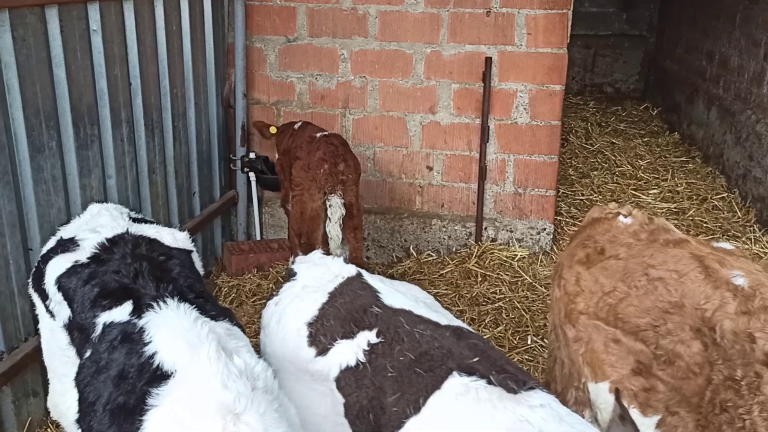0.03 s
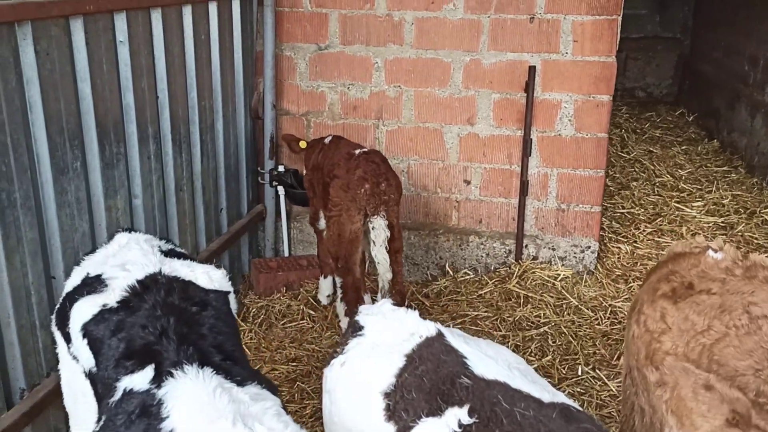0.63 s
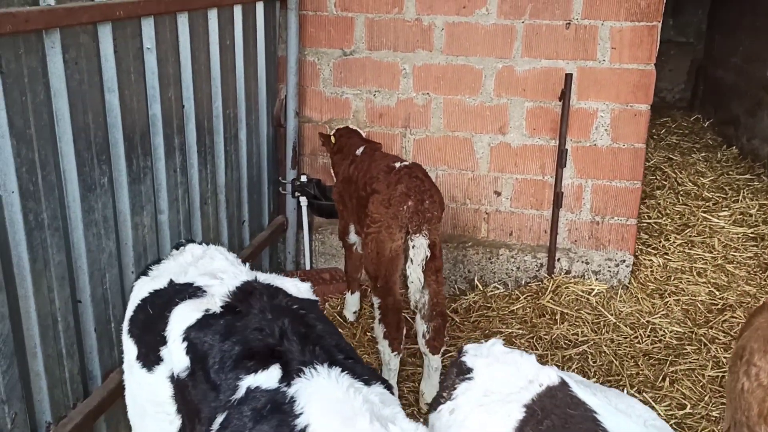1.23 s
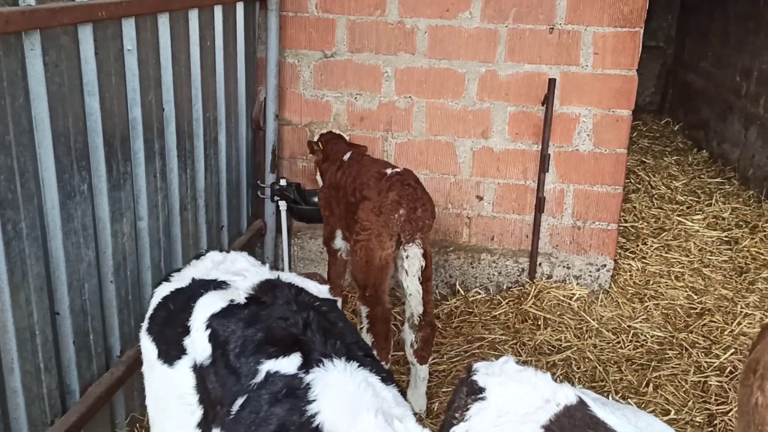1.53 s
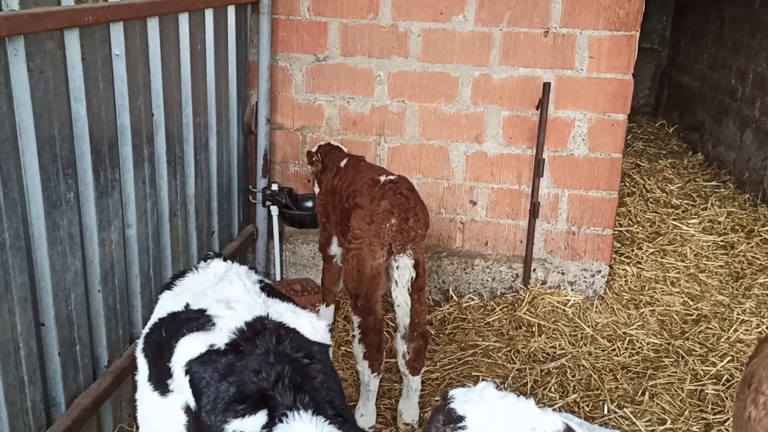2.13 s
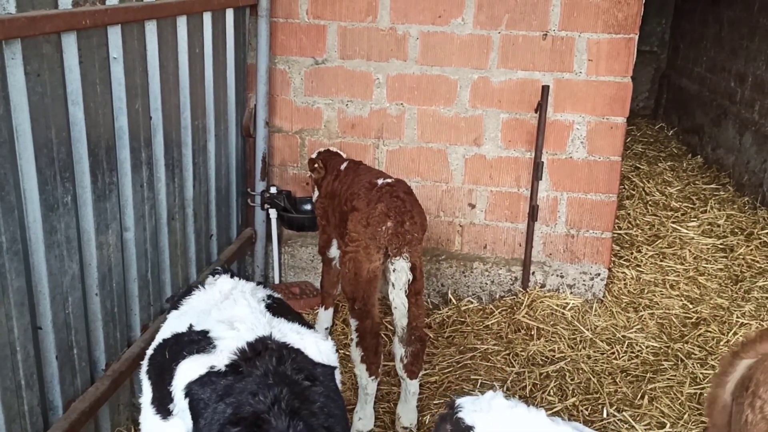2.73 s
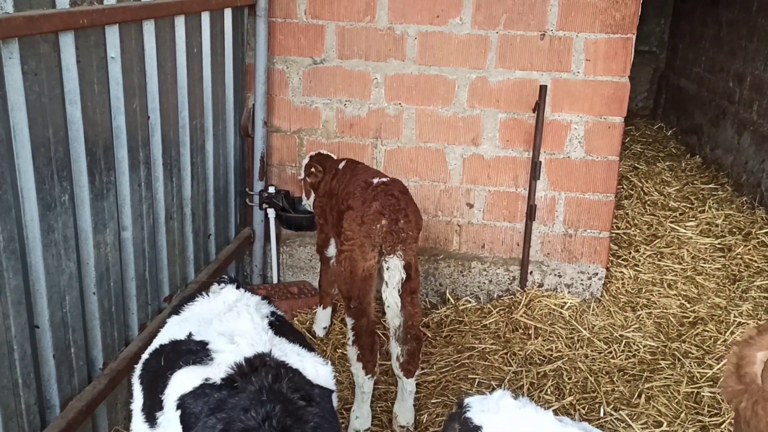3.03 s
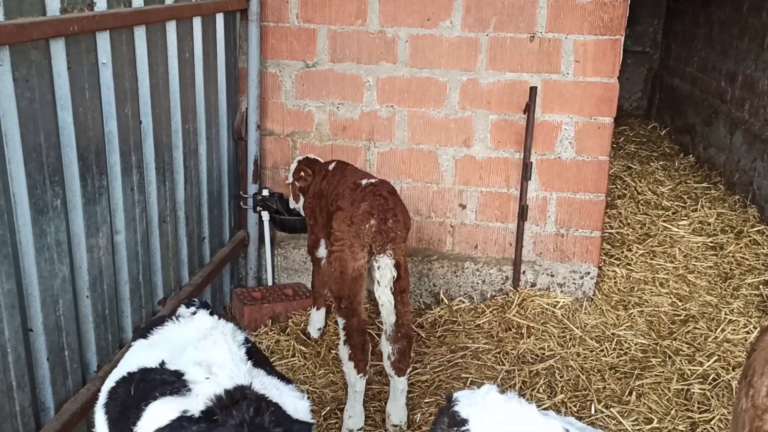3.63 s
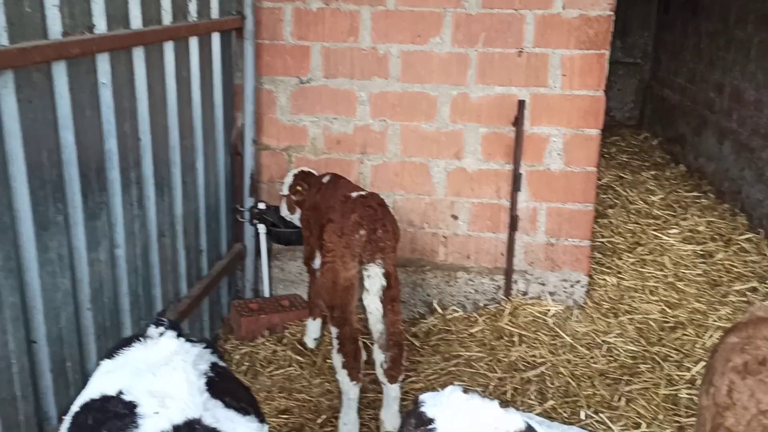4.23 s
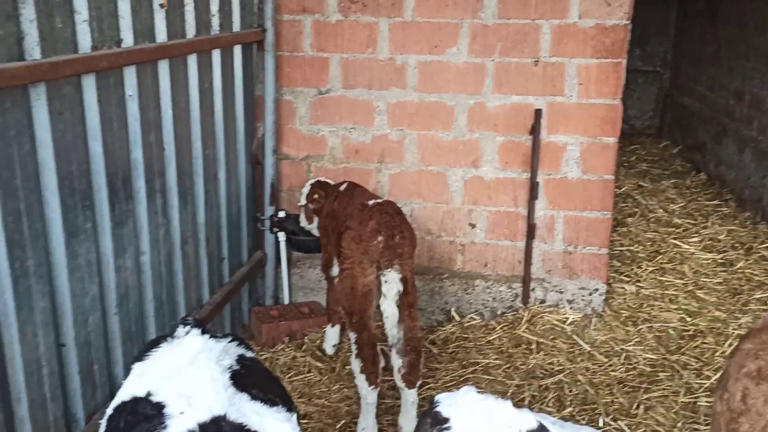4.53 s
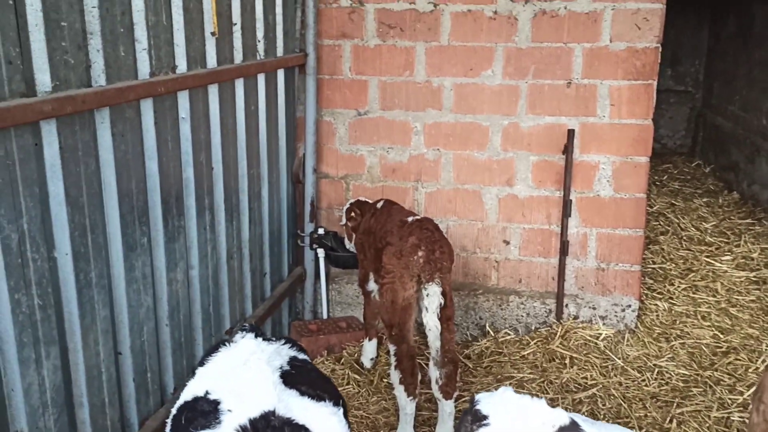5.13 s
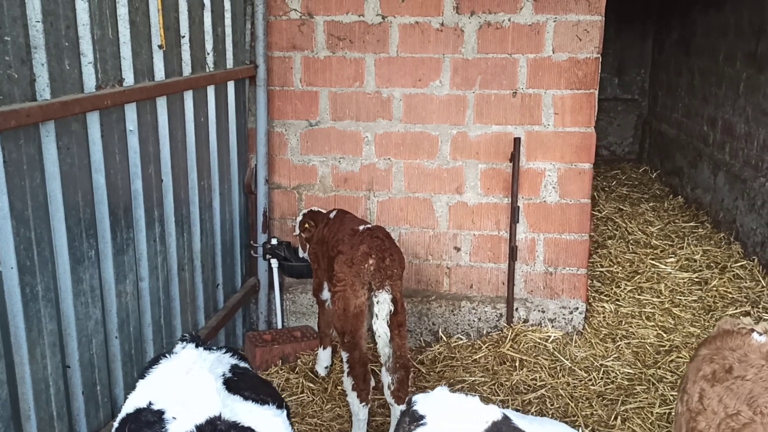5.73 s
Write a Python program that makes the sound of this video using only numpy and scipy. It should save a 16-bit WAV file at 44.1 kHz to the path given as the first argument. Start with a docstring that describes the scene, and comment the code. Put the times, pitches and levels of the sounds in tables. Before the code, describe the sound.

Water hisses and sprays in two long draughts as a calf drinks, over low rumbling, soft hoof thuds and straw rustles.

```python
"""A straw-bedded barn of brick and sheet steel, heard on a spaced stereo pair at the edge of the pen.
A calf drinks from a self-filling water bowl: the valve hisses and sprays while its muzzle presses
the ticking, rasping paddle. Hooves rustle the straw; dull thuds are probably hooves on the floor.
Behind it a low rumble, probably wind on the sheeting, swells in the barn's resonances, loose sheets
knock, and a faint motor hums in the steady air of the yard."""
import sys
import numpy as np
from scipy import signal
from scipy.fft import rfft, irfft
from scipy.io import wavfile
from scipy.ndimage import uniform_filter1d

SR = 44100
rng = np.random.default_rng(int(sys.argv[2]) if len(sys.argv) > 2 else 0)


def output_pcm(signal):
    """Save a mono or channel-first signal as 16-bit PCM at the path in sys.argv[1].

    Samples are clipped to [-1, 1] before scaling.
    """
    pcm = np.clip(np.atleast_2d(signal).T, -1, 1) * 32767
    wavfile.write(sys.argv[1], SR, np.round(pcm).astype(np.int16))


N = 259308
TIME = np.arange(N) / SR
HZ = np.maximum(np.arange(N // 2 + 1) * SR / N, 1)
MIC_LAG_S = .0005   # travel time from one microphone to the other

# resonances of the valve body: (centre [Hz], width [Hz], lift [dB])
VALVE_MODES = [(1960, 160, 3.5), (2950, 450, -2), (3800, 300, 4.5), (4190, 70, 2), (6800, 110, 3),
               (7020, 200, -2), (7440, 150, 3.5), (7640, 70, 9), (7760, 120, -3), (8130, 90, 2),
               (12980, 100, 4), (13610, 90, 4), (14210, 80, 3), (14400, 100, 4), (14940, 100, 3)]
# resonances of the barn: (centre [Hz], width [Hz], lift [dB])
BARN_MODES = [(57, 10, -5.5), (89.7, 6.1, 4.5), (112, 14, -2.5), (123.4, 15, 8), (157, 9.3, 8.5),
              (205.2, 25, 5), (240, 8, -3), (322.7, 9.8, 6.5), (375, 7.9, -2), (670, 14, 3)]


def drinker():
    """The jet hisses in the valve body, spatters on the bowl and breaks into fine, spluttering spray."""
    # the muzzle holds the paddle down: (time [s], length [s], jet [dB], spray [dB], closing time [s])
    presses = [(0.178, .05, -48.5, -57, 0.18), (0.735, 0.079, -47.5, -49.5, 0.019),
               (0.872, 1.776, -49.5, -55.5, 0.07), (3.12, .1, -55.5, -68, 0.017),
               (3.716, 1.843, -49.5, -57.5, 0.036), (5.76, 0.033, -55, -60, 0.022)]
    # how fully the water runs in the long draughts: (time [s], jet gain [dB], spray gain [dB])
    flow = [(1.08, -6, -6), (1.24, -0.5, 0), (1.33, -1, -1), (1.44, 2, 0), (1.55, -1.5, -5),
            (1.66, 2.5, 0.5), (1.76, 0, 4.5), (1.87, 1.5, 2.5), (2.0, 0.5, -0.5), (2.2, 0.5, -2.5),
            (2.37, -3.5, -6), (2.5, -0.5, 0), (2.65, -0.5, -4), (3.77, 5.5, 5), (3.87, 0, 0),
            (3.98, 1.5, -2.5), (4.17, 0, -1.5), (4.31, 0, 3), (4.55, -1, -5), (4.75, -1.5, -6),
            (4.95, 0, -4.5), (5.08, 0, 0.5), (5.3, -.5, -1.5), (5.53, -4, -4.5)]
    # spectra of the jet, the spray and the spatter on the bowl: (frequency [Hz], level [dB])
    jet_spectrum = [(900, -6.5), (1900, -9), (2500, -6.5), (3700, -5.5), (4650, -5), (4900, -11.5),
                    (5950, -9), (6200, 1), (8450, -3), (8700, -22.5), (9300, -63.5)]
    spray_spectrum = [(10500, -50.5), (11300, -45), (11650, 9), (12700, 9), (13100, 8), (15450, 10),
                      (16000, -29)]
    spatter_spectrum = [(1500, -25.5), (3000, -3), (4300, -10), (5100, -9), (6300, -7), (7700, 0.5),
                        (8450, -3), (8900, -57)]
    # the jet surges as it catches air: (time [s], level [dB], rise [s], decay [s])
    surges = [(1.36, -62, .012, 0.022), (1.722, -51, .006, 0.028), (1.79, -67, .01, .02),
              (1.977, -53, .004, 0.011), (3.729, -52, 0.0088, .035)]
    # sharp spits at the nozzle: (time [s], level [dB], rise [s], decay [s])
    spits = [(.169, -49, 0.0009, 0.006), (.518, -53.5, .0015, 0.0039), (1.7225, -42, .001, 0.018),
             (1.892, -50, 0.00088, 0.0066), (2.258, -58, .012, .015), (3.729, -59, 0.0032, 0.038),
             (5.641, -60, .001, 0.0039)]
    dribble_jet_db, dribble_spray_db = -64.5, -70.5   # the released valve keeps dribbling

    drops = .22 * from_side(grains(per_s=63, spread_db=1))
    jet = diffuse() + .5 * from_side(grains(per_s=2000, spread_db=2)) + drops / 2
    spray = diffuse() + .35 * from_side(grains(per_s=290, spread_db=-4)) + drops
    jet = walled(colour(jet, jet_spectrum, VALVE_MODES), spread_db=1.7, width_hz=32)
    spray = walled(colour(spray, spray_spectrum, VALVE_MODES), spread_db=1.7, width_hz=32)
    impacts = barn_echo(from_side(grains(per_s=130, spread_db=3)))
    spatter = from_db(-15) * colour(impacts, spatter_spectrum)

    splutter = from_db(.6 * drift(rate_hz=14))   # uneven flow moves jet and spray together
    flicker = from_db(1.5 * drift(rate_hz=25))
    start, length, jet_db, spray_db, closing = np.transpose(presses)
    jet_flow_db, spray_flow_db = in_time(flow)
    jet_flow = valve(zip(start, length, jet_db, closing)) * from_db(jet_flow_db)
    spray_flow = valve(zip(start, length, spray_db, closing)) * from_db(spray_flow_db)
    jet_level = np.hypot(from_db(dribble_jet_db), jet_flow) * splutter + bursts(surges)
    spray_level = np.hypot(from_db(dribble_spray_db), spray_flow) * splutter * flicker + bursts(spits)
    return (swelling(jet) + spatter) * jet_level * pan(.3) + spray * spray_level * pan(-2.5)


def valve(presses, open_s=.031):
    """Envelope of the flow: each press opens the valve quickly, holds it and lets it close."""
    flow = np.zeros(N)
    for start, length, db, closing in presses:
        opening = np.clip((TIME - start) / open_s, 0, 1)
        flow += from_db(db) * opening * np.exp(-np.maximum(TIME - start - length, 0) / closing)
    return flow


def swelling(jet):
    """Each band of the jet's hiss swells and sinks by itself."""
    # bands of the jet's resonances: (centre [Hz])
    centres = [2000, 3500, 4400, 6500, 7700]
    spectrum = rfft(jet)
    bands = (irfft(spectrum * np.interp(HZ, centres, weights), N) for weights in np.eye(len(centres)))
    return sum(band * from_db(1.4 * drift(rate_hz=9)) for band in bands)


def paddle_rasps_and_hiss_swell():
    """Grainy noise rings one resonance at a time, some sliding, over a bright, dry hiss."""
    # at 1.33 s the valve's hiss swells and brightens briefly; the other rows are slips of the paddle:
    # (time [s], level [dB], rise [s], decay [s], centre [Hz], width [Hz], slide [Hz/s])
    events = [(.171, -49, 0.017, .035, 2320, 900, 0), (.762, -53, 0.035, 0.03, 4570, 380, 0),
              (.76, -55.5, 0.042, 0.058, 3600, 1200, 0), (1.33, -52, .14, 0.027, 6900, 1100, 0),
              (2.254, -50, 0.011, 0.028, 3800, 700, 0), (2.262, -52, .02, .01, 7160, 1200, 0),
              (3.183, -49.5, 0.025, 0.032, 3870, 1000, -9000), (3.735, -48.5, 0.015, 0.035, 1850, 450, 1),
              (3.733, -60, 0.02, 0.026, 4040, 800, 2), (4.935, -51.5, 0.0093, 0.037, 3700, 1190, 0),
              (5.758, -57.5, 0.0083, 0.04, 4050, 450, -7000)]
    # spectrum of the dry hiss: (frequency [Hz], level [dB])
    hiss_spectrum = [(1200, -23), (3000, -17), (4400, -17), (5100, -27), (6500, 6), (7700, 7), (8450, 10),
                     (9000, -65)]
    noise = diffuse() + .31 * from_side(grains(per_s=800, spread_db=4))
    spectrum = rfft(noise)
    hiss = from_db(-3) * colour(noise, hiss_spectrum, VALVE_MODES)
    out = np.zeros((2, N))
    for start, db, rise, decay, hz, width, slide in events:
        band = np.exp(-np.log(2) * (2 * (HZ - hz) / width) ** 2 / 2)
        resonance = np.fft.ifft(spectrum * band, N)   # complex, so the glide can shift its pitch
        glide = np.exp(1j * np.pi * slide * (TIME - start - rise) ** 2)
        ringing = rms_one(np.real(resonance * glide))
        out += (ringing + hiss) * bursts([(start, db, rise, decay)])
    return out


def bowl_ticks():
    """Hard, well-damped contacts, probably the paddle, each with early echoes and a short tail."""
    # ticks at the bowl: (time [s], level [dB], left minus right [dB])
    ticks = [(0.088, -36, 12), (0.097, -35, 4), (0.1706, -31, 2), (.2415, -35.5, 1), (0.297, -34.5, -1),
             (0.519, -37, 5), (0.6805, -27, 7), (.9307, -28.5, 9), (1.6518, -27, 10), (1.8926, -20, 5),
             (3.08, -45, 3), (4.053, -31, 9)]
    # what the paddle rings with: (frequency [Hz], gain [dB], time to fall 60 dB [s])
    modes = [(4200, -20, .005), (5500, -14, .002), (6800, -4, .0032), (7600, -2, .0045)]
    # echoes off bowl, sheeting and far wall: (delay [s], gain [dB], left minus right [dB])
    echoes = [(.0042, -10, 3), (.0062, -14, -3), (.0083, -13, 2), (.0158, -9, -7), (.0185, -16, 3),
              (.0208, -14, -2)]
    start, db, side_db = np.transpose(ticks)
    out = np.zeros((2, N))
    for hz, mode_db, t60 in modes:
        size = from_db(db + mode_db + rng.normal(0, 1, len(start)))
        clicks = np.zeros((2, N))
        clicks[:, (start * SR).astype(int)] = size * pan(side_db)
        for delay, echo_db, echo_side_db in echoes:
            clicks[:, ((start + delay) * SR).astype(int)] += size * from_db(echo_db) * pan(echo_side_db)
        out += ring(clicks, hz, t60)
    out = signal.sosfilt(signal.cheby2(10, 60, 9400, "low", fs=SR, output="sos"), out)
    out = signal.sosfilt(signal.butter(4, 4000, "high", fs=SR, output="sos"), out)
    return barn_echo(out)


def straw():
    """A hoof crushes many stalks, then sinks in with a dull crunch; single stalks crackle in clumps."""
    # hooves shuffling, and weight coming down: (time [s], level [dB], rise [s], decay [s])
    steps = [(.1695, -42.5, 0.00087, 0.0061), (.172, -46.5, 0.003, 0.028), (.185, -46, .026, .018),
             (.296, -44.5, .001, 0.0048), (.888, -45, 0.026, 0.036), (1.34, -46, 0.0089, 0.019),
             (1.635, -48, 0.027, 0.036), (2.255, -51.5, 0.014, 0.038), (2.81, -53, .012, 0.048),
             (3.18, -51, 0.082, 0.084), (3.48, -56, 0.017, 0.1), (3.727, -49, 0.004, 0.063),
             (4.051, -50, .001, 0.0071), (4.66, -49.5, 0.0058, 0.13), (4.85, -51.5, 0.0059, 0.093),
             (4.94, -47.5, 0.015, 0.027)]
    treads = [(.277, -40.5, 0.0054, 0.083), (.56, -42, .002, 0.029), (.68, -45, 0.005, 0.042),
              (.92, -47.5, 0.011, 0.19), (1.65, -49, 0.011, 0.21)]
    # spectra of rustling straw and crunching bedding: (frequency [Hz], level [dB])
    straw_spectrum = [(500, -3.5), (1100, 3), (1600, 3.5), (2100, 4), (2350, -1.5), (3000, 0.5),
                      (4100, -2.5), (5100, -12), (6300, -7.5), (7600, 0), (8450, -11.5), (9000, -70)]
    bedding_spectrum = [(150, -28), (300, 5), (600, 8), (900, 1.5), (1300, -14), (3000, -41), (8000, -61)]
    crackle = from_side(grains(per_s=1100, spread_db=3.5)) + 1.2 * diffuse()
    rustle = walled(colour(crackle, straw_spectrum), spread_db=1.4, width_hz=70)
    crunch = colour(crackle, bedding_spectrum)
    snaps = barn_echo(from_side(grains(per_s=220, spread_db=2.5)))
    stalks = colour(snaps, straw_spectrum)
    clumps = from_db(-64 + 4 * np.minimum(drift(rate_hz=10), 2))
    return rustle * bursts(steps) + crunch * bursts(treads) + stalks * clumps


def hoof_thuds():
    """The packed floor and the pen boom briefly, probably under hooves."""
    # dull thuds: (time [s], level [dB], rise [s], decay [s])
    thuds = [(.27, -31.5, 0.01, 0.04), (.348, -33.5, 0.0036, 0.017), (.452, -36, 0.0075, 0.012),
             (.526, -30.5, .003, .012), (.558, -30, 0.0037, 0.013), (.695, -31.5, 0.0044, 0.024),
             (.945, -37.5, 0.0066, 0.027), (1.034, -35, .003, 0.016), (2.376, -29, 0.01, .022),
             (3.83, -30, .012, .016)]
    # spectrum of a thud: (frequency [Hz], level [dB])
    thud_spectrum = [(50, -33), (110, -7), (190, 2.5), (280, 4), (400, -15.5), (700, -30), (3000, -90)]
    boom = colour(diffuse(likeness=1), thud_spectrum)
    return levelled(boom, samples=900) * bursts(thuds)


def rumble():
    """Gusts, probably wind on the sheeting, drive the barn's low resonances."""
    # spectrum of the rumble: (frequency [Hz], level [dB])
    rumble_spectrum = [(20, -46.5), (40, -33), (56, -16.5), (70, -14), (88, -6), (140, -5), (220, -0.5),
                       (370, -7), (450, -13.5), (650, -21), (900, -26), (1400, -49), (4000, -95.5)]
    # gusts on the building: (peak time [s], upper part [dB], deepest part [dB], half-length [s])
    gusts = [(0.472, -37.5, -62, 0.17), (1.68, -53, -49, 0.044), (1.97, -39.5, -57, 0.052),
             (2.42, -39, -43, 0.042), (2.61, -36.5, -41.5, 0.064), (3.184, -41.5, -54, 0.13),
             (3.6, -34.5, -47.5, 0.16), (4.117, -39, -53, 0.21), (4.432, -36.5, -40, 0.057),
             (4.81, -36.5, -65, 0.044), (5.03, -35, -45, 0.026), (5.214, -28, -46, 0.07),
             (5.355, -33.5, -42, 0.091), (5.539, -28, -36, 0.07), (5.712, -26, -38.5, 0.05),
             (5.818, -32, -48, 0.052)]
    # rumble between gusts: (time [s], upper part [dB], deepest part [dB])
    breeze = [(0, -41, -50.5), (.6, -45.5, -52), (.85, -42, -55.5), (1.05, -40.5, -53), (1.3, -42.5, -52.5),
              (1.9, -39.5, -51), (2.75, -40.5, -47), (2.92, -42.5, -56), (3.3, -40.5, -51.5),
              (5.88, -41.5, -51.5)]
    peak, upper_db, deep_db, half = np.transpose(gusts)
    upper_breeze_db, deep_breeze_db = in_time(breeze)
    boom = colour(diffuse(likeness=.97), rumble_spectrum, BARN_MODES)
    deep = irfft(rfft(boom) / (1 + (HZ / 105) ** 16), N)
    upper_level = gusting(upper_breeze_db, zip(peak, upper_db, half))
    # the deepest air swells a little later and more briefly
    deep_level = gusting(deep_breeze_db, zip(peak + .02, deep_db, half * .88))
    upper = upper_level * levelled(boom - deep, samples=3600)
    return upper + deep_level * levelled(deep, samples=6000) * pan(-.91)


def gusting(breeze_db, gusts):
    """Level of the wind: each gust adds a bell of power to the breeze."""
    power = sum(from_db(db) ** 2 * np.exp(-((TIME - peak) / half) ** 2) for peak, db, half in gusts)
    return np.sqrt(from_db(breeze_db) ** 2 + power)


def sheeting(drone_hz=355.4, drone_width_hz=17):
    """Dull knocks ring around 320 Hz. The early ones fall together with the hoof thuds, and the later ones come
    as loose steel sheets are buffeted. One panel drones on a single resonance."""
    # the knocks, and the panel's dying drone: (time [s], level [dB], rise [s], decay [s])
    knocks = [(.279, -41, 0.003, 0.031), (.345, -38.5, 0.0034, .025), (.526, -38, .003, 0.021),
              (.695, -37.5, 0.0045, 0.043), (5.15, -31, 0.018, 0.032), (5.228, -25, 0.0059, 0.025),
              (5.302, -32, 0.0023, 0.027), (5.36, -29, 0.0047, 0.054), (5.474, -26, 0.019, 0.027)]
    drone = [(0, -42.5, 0.018, 0.24)]
    # spectrum of a knock: (frequency [Hz], level [dB])
    knock_spectrum = [(100, -34), (240, -25), (320, 6), (390, -4), (460, -14), (800, -19), (2000, -92)]
    sheets = colour(diffuse(likeness=.99), knock_spectrum, BARN_MODES)
    panel = irfft(rfft(diffuse(likeness=1)) / (1 + (2 * (HZ - drone_hz) / drone_width_hz) ** 2), N)
    return levelled(sheets, samples=2000) * bursts(knocks) + levelled(panel, samples=4000) * bursts(drone)


def yard_air():
    """Steady air from the yard, partly all around and partly from the barn's open side."""
    # spectrum of the air: (frequency [Hz], level [dB])
    air_spectrum = [(25, -37.5), (60, -24.5), (120, -5.5), (350, 0), (650, -4), (1100, -16.5),
                    (1500, -13.5), (2000, -20), (2400, -25), (4000, -23.5), (5200, -33.5), (7500, -23),
                    (8500, -54), (9000, -67)]
    air = diffuse(likeness=.74) + .43 * from_side(rng.standard_normal(N))
    return from_db(-45.5) * walled(colour(air, air_spectrum), spread_db=3, width_hz=18)


def motor_hum(speed_waver=.0012, waver_db=1.8):
    """A faint motor hums in three tones, each wavering a little in pitch and level."""
    # motor tones: (frequency [Hz], gain [dB], phase lead at the right microphone [rad])
    tones = [(366, -1, 0.7), (480.3, -1, 1.33), (970, -11, 3.25)]
    # loudness of the motor: (time [s], level [dB])
    loudness = [(0, -58.5), (.9, -49), (1.5, -56), (3.6, -51.5), (4.4, -50.5), (5.5, -51), (5.88, -49.5)]
    motor_db, = in_time(loudness)
    hum = np.zeros((2, N))
    for hz, db, lead in tones:
        phase = 2 * np.pi * np.cumsum(hz * (1 + speed_waver * drift(rate_hz=2.83))) / SR
        level = from_db(motor_db + db + waver_db * drift(rate_hz=2.3))
        hum += np.sqrt(2) * level * np.sin(phase + np.array([[0], [lead]]))
    return hum


def motor_whine(roughness=.8, width_hz=24):
    """A thin whine rises out of the hum and sinks, blurred differently at each microphone by walls."""
    # course of the whine: (time [s], pitch [Hz], level [dB])
    course = [(4.0, 975, -72), (4.4, 978, -65), (4.84, 965, -66), (4.92, 978, -61.5), (5.05, 990, -61.5),
              (5.3, 985, -61), (5.52, 975, -63), (5.7, 970, -76)]
    hz, level_db = in_time(course)
    blur = np.array([drift(width_hz) + 1j * drift(width_hz) for mic in range(2)])
    tone = np.exp(2j * np.pi * np.cumsum(hz) / SR)
    return from_db(level_db) * rms_one(np.real((1 + roughness * blur) * tone))


def barn_echo(x, t60=.1, wet_db=-2):
    """Add a scattered tail from the walls, kept short by the bedding, different at each microphone."""
    t = TIME[:SR // 2]
    tail = rng.standard_normal((2, len(t))) * from_db(-60 * t / t60)
    tail /= np.sqrt(np.sum(tail ** 2, axis=1, keepdims=True))
    return x + from_db(wet_db) * signal.fftconvolve(x, tail, axes=1)[:, :N]


def walled(x, spread_db, width_hz):
    """Echoes off nearby hard walls leave narrow peaks and dips in the spectrum; rms 1."""
    bumps = rng.standard_normal(int(SR / width_hz))
    ripple_db = spread_db * np.interp(HZ / width_hz, np.arange(len(bumps)), bumps)
    return rms_one(irfft(rfft(x) * from_db(ripple_db), N))


def diffuse(likeness=.36):
    """Noise from all around: the spaced microphones hear it alike only at long wavelengths."""
    alike = likeness * np.sinc(2 * HZ * MIC_LAG_S)
    mid, side = rfft(rng.standard_normal((2, N)))
    return irfft(np.sqrt((1 + alike) / 2) * mid + np.sqrt((1 - alike) / 2) * side * [[1], [-1]], N)


def from_side(x):
    """Direct sound reaches the right microphone first."""
    return np.array([np.interp(TIME - MIC_LAG_S, TIME, x), x])


def pan(db):
    """Left and right gains for a level difference, positive to the left."""
    return from_db(np.array([[.5], [-.5]]) * db)


def colour(x, spectrum, modes=()):
    """Give a sound a broad spectrum with resonances on it; rms 1."""
    hz, level_db = np.transpose(spectrum)
    shape_db = np.interp(np.log(HZ), np.log(hz), level_db)
    for centre, width, lift_db in modes:
        shape_db += lift_db / (1 + (2 * (HZ - centre) / width) ** 2)
    return rms_one(irfft(rfft(x) * from_db(shape_db), N))


def grains(per_s, spread_db):
    """Random tiny clicks of uneven size; rms 1."""
    sizes = from_db(spread_db * np.minimum(rng.exponential(1, N), 4)) * rng.choice([-1, 1], N)
    return rms_one(sizes * (rng.random(N) < per_s / SR))


def bursts(rows):
    """Envelope of bursts that rise in a straight line and die away."""
    out = np.zeros(N)
    for start, db, rise, decay in rows:
        first = int(start * SR)
        t = TIME[:min(SR, N - first)]
        attack = np.clip(t / rise, 0, 1)
        out[first:first + len(t)] += from_db(db) * attack * np.exp(-np.maximum(t - rise, 0) / decay)
    return out


def ring(clicks, hz, t60):
    """A unit click sets a sine of height 1 ringing and dying away."""
    radius, angle = from_db(-60 / (t60 * SR)), 2 * np.pi * hz / SR
    feedback = [1, -2 * radius * np.cos(angle), radius ** 2]
    return signal.lfilter([0, np.sin(angle)], feedback, clicks + 1e-18)


def drift(rate_hz):
    """A slow random wander; rms 1."""
    return rms_one(irfft(rfft(rng.standard_normal(N)) / (1 + (HZ / rate_hz) ** 2), N))


def levelled(x, samples):
    """Even out a noise's slow level to rms 1."""
    return x / np.sqrt(uniform_filter1d(np.mean(x ** 2, axis=0), size=samples))


def in_time(rows):
    """The columns of a curve, sample by sample."""
    times, *columns = np.transpose(rows)
    return [np.interp(TIME, times, column) for column in columns]


def rms_one(x):
    """Scale so that the middle of the stereo image has rms 1."""
    return x / np.sqrt(np.mean(np.atleast_2d(x).mean(0) ** 2) + 1e-20)


def from_db(db):
    """Decibels to gain."""
    return 10 ** (np.asarray(db) / 20)


def scene():
    """Everything that reaches the microphones at the edge of the pen."""
    background = rumble() + sheeting() + yard_air() + motor_hum() + motor_whine()
    return background + drinker() + paddle_rasps_and_hiss_swell() + hoof_thuds() + straw() + bowl_ticks()


def record(dry, cutoff_hz=15900):
    """The top of the treble is cut steeply."""
    return signal.sosfilt(signal.ellip(12, .1, 80, cutoff_hz, fs=SR, output="sos"), dry)


dry = scene()
out = record(dry)
output_pcm(out)
```